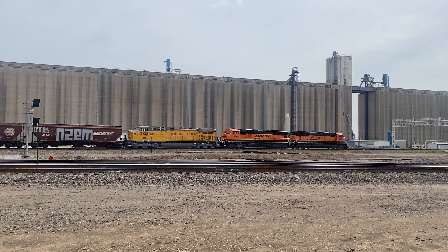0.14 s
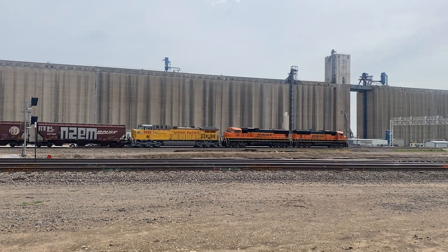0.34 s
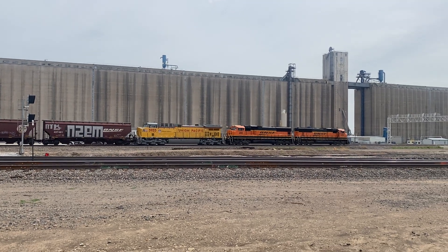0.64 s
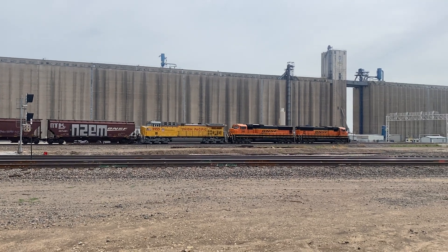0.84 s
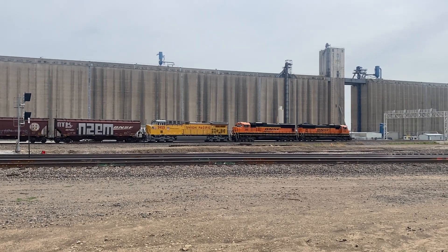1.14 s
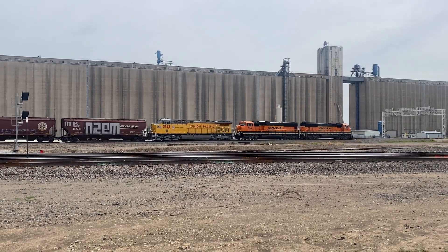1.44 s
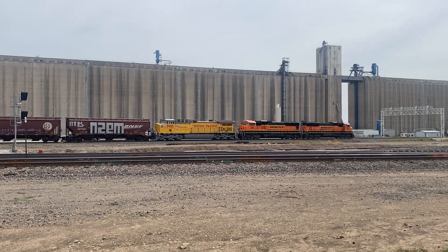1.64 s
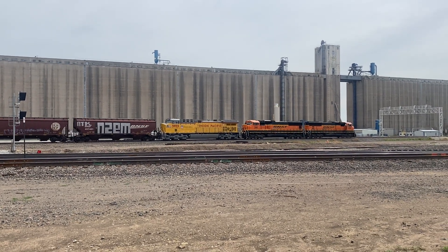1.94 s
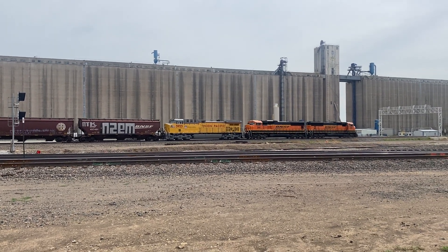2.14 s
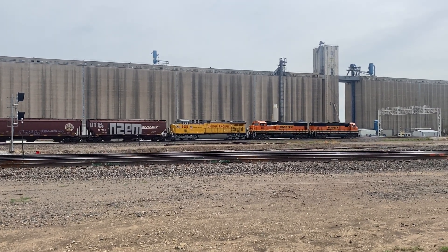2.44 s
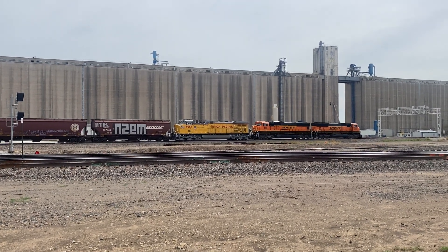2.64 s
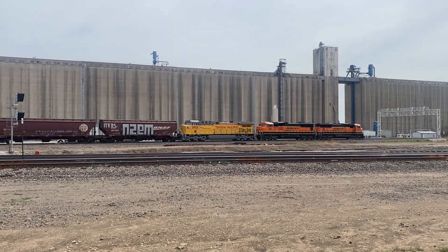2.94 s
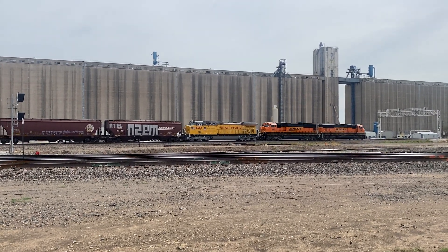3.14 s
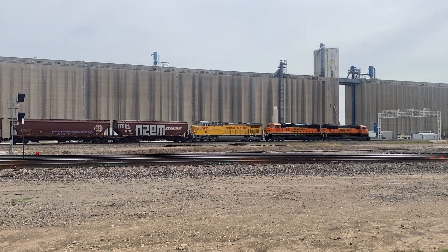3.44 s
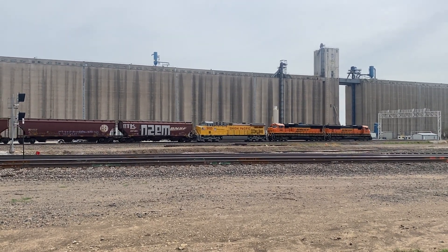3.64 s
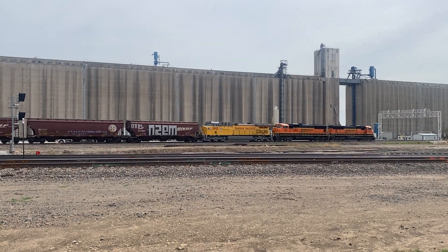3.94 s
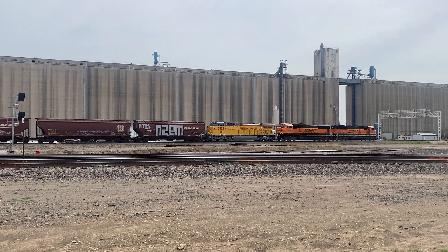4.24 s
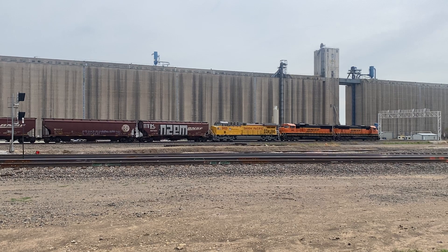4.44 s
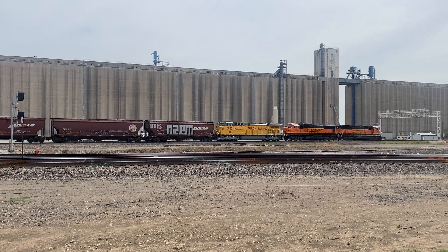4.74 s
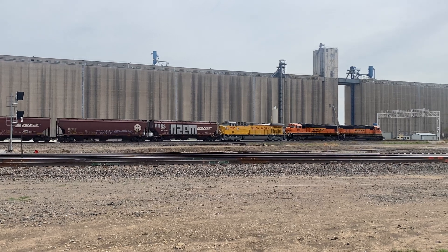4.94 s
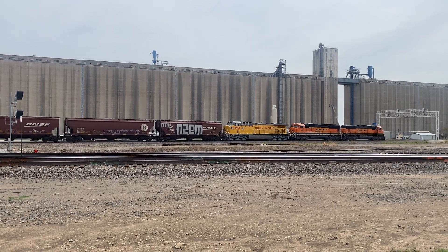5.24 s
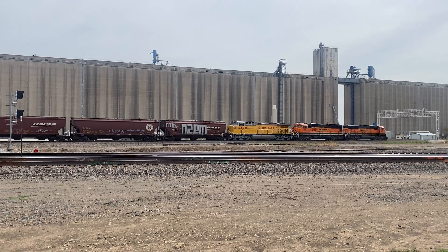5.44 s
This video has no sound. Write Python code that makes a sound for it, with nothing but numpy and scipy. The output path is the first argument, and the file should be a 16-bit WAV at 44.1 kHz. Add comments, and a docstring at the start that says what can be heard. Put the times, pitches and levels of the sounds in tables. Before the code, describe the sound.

Low beating diesel rumble with dull thumps, hissing, singing wheels on rail, a few faint bird whistles, and increasingly frequent metallic clanks.

```python
"""Slow freight train

Diesel locomotives haul a freight train slowly past a concrete grain elevator, heard across an open yard.
Their idling engines, made of sine waves and puffing noise, beat in a deep throb; short booms thump on top.
Wheels roar and rub as bands of noise and sing as wavering tones. Steel scrapes and knocks make wheels and
loose parts ring, and a small bird calls three times in gliding whistles."""
import sys
import numpy as np
from scipy import signal
from scipy.fft import rfft, irfft, next_fast_len
from scipy.io import wavfile

SR = 44100
rng = np.random.default_rng(int(sys.argv[2]) if len(sys.argv) > 2 else 0)


def bounce(signal):
    """Save signal as a 16-bit WAV file at the path given by the first command-line argument."""
    frames = np.transpose(np.atleast_2d(signal))
    limited = np.clip(frames, -1, 1)
    pcm = np.round(limited * 32767).astype(np.int16)
    wavfile.write(sys.argv[1], SR, pcm)


N = 246519


def from_db(db):
    """Decibels to gain."""
    return 10 ** (np.asarray(db) / 20)


def rms_one(x):
    """Scale to rms 1."""
    return x / np.sqrt(np.mean(x ** 2) + 1e-20)


def seconds():
    """The time of every sample."""
    return np.arange(N) / SR


def in_time(rows):
    """Join the points of a table with straight lines: one curve for each column after the times."""
    s, *columns = np.transpose(rows)
    return [np.interp(seconds(), s, column) for column in columns]


def at_hz(points, hz):
    """Read a table of pitches and values, on a log-frequency axis."""
    table_hz, values = np.transpose(points)
    return np.interp(np.log(hz), np.log(table_hz), values)


def pan(left_db):
    """Gains of the two channels; the left is this many dB above the right."""
    return from_db(np.array([[left_db], [-left_db]]) / 2)


def drift(rate):
    """Slow random wandering with spread 1; a higher rate (Hz) wanders faster."""
    step = 40  # samples between the computed points
    r = np.exp(-2 * np.pi * rate * step / SR)
    noise = rng.standard_normal(N // step + 2002)
    slow = signal.lfilter([1], [1, -2 * r, r * r], noise)[2000:]  # skip the filter's start
    return np.interp(np.arange(N) / step, np.arange(len(slow)), rms_one(slow))


def wavering(angle, width_hz):
    """A tone whose strength and phase wander at random, which widens its pitch."""
    return drift(width_hz) * np.cos(angle) + drift(width_hz) * np.sin(angle)


def swell(start, rise, hold, t60):
    """Gain that rises to 1, holds, then falls by 60 dB in every t60 seconds."""
    age = seconds() - start
    fading = np.maximum(age - rise - hold, 0)
    return np.clip(age / rise, 0, 1) * from_db(-60 * fading / t60)


def ring(drive, hz, t60):
    """A resonance: a unit click sets a sine of height 1 ringing, which then dies away."""
    r, w = from_db(-60 / (t60 * SR)), 2 * np.pi * hz / SR
    return signal.lfilter([0, np.sin(w)], [1, -2 * r * np.cos(w), r * r], drive + 1e-18)


# how alike left and right are at each pitch: (f/Hz, likeness from 0 to 1)
LIKENESS_BY_PITCH = [(60, .85), (130, .8), (250, .62), (450, .33), (700, .48), (900, .12), (1500, .1),
                     (1850, .55), (2450, .75), (2950, .3), (3370, .3), (3650, .75), (4100, .85),
                     (4600, .25), (5700, .6), (7200, .92), (15000, .92)]
# which side is louder at each pitch: (f/Hz, left minus right level/dB)
LEFT_LEAN_BY_PITCH = [(300, .8), (520, 3.1), (1550, 3.2), (1850, .7), (2500, .2), (3200, 3), (3700, -.6),
                      (4100, -.4), (4700, 3.8), (5800, 2.6), (7300, .6), (9000, .1)]


def spread(mid, side, hz):
    """Mix two unrelated signals into a stereo pair, as alike and as lopsided as the yard leaves this pitch."""
    alike = np.clip(at_hz(LIKENESS_BY_PITCH, hz), -1, 1)
    shared = np.sqrt((1 + alike) / 2) * mid
    opposed = np.sqrt((1 - alike) / 2) * side * np.array([[1], [-1]])
    return (shared + opposed) * pan(at_hz(LEFT_LEAN_BY_PITCH, hz))


def banded_noise(spectrum, patchy_db):
    """Third-octave bands of stereo noise, each with its own level and flicker; rms 1."""
    edges = 20 * 2 ** (np.arange(30) / 3)
    out, white = 0, rng.standard_normal((2, 2, N))
    for k, (low, high) in enumerate(zip(edges, edges[1:])):
        if high > spectrum[0][0] and low < spectrum[-1][0]:
            band = signal.butter(2, [low, high], "band", fs=SR, output="sos")
            mid, side = signal.sosfilt(band, white[k % 2])  # neighbours use unrelated noise
            hz = np.sqrt(low * high)
            level = from_db(at_hz(spectrum, hz) + patchy_db * drift(15.7))
            out = out + level * spread(mid, side, hz)
    return rms_one(out)


def tones(modes, waver):
    """Sum of tones, each a steady line plus a wavering part, scattered differently to each side."""
    out = 0
    for hz, db, width_hz in modes:
        angle = 2 * np.pi * hz * seconds()
        mid = np.sqrt(2) * np.cos(angle) + waver * wavering(angle, width_hz)
        side = wavering(angle, width_hz)
        out = out + from_db(db) * spread(rms_one(mid), side, hz)
    return out


def driven(force, hz, t60):
    """Rough contact, as noise, shakes a resonance on either side; it gets as much power as the force has."""
    rung = rms_one(ring(force * rng.standard_normal((2, N)), hz, t60))
    return np.sqrt(np.mean(force ** 2)) * spread(*rung, hz)


def struck(s, rise, hz, t60):
    """A resonance starts as a clean sine and dies away."""
    angle = 2 * np.pi * hz * (seconds() - s)
    return np.sqrt(2) * swell(s, rise, 0, t60) * spread(np.sin(angle), np.cos(angle), hz)


# one dip of the engines' bass: (t/s, fall/s, hold/s, recovery/s, depth/dB)
BASS_DIP_SHAPE = (1.11, 0.2, 0.17, 0.64, 17)


def bass_dip():
    """The bass sinks once and recovers: how many dB it is down."""
    *times, depth_db = BASS_DIP_SHAPE
    return depth_db * np.interp(seconds(), np.cumsum(times), [0, 1, 1, 0])


EVEN_FIRING_HZ, EVEN_START_S = 71.0, -.0006
LOPING_FIRING_HZ, LOPING_START_S, CYLINDERS = 70.95, .0985, 16


def even_firing():
    """Angle of the even engine's firing, one full turn for each firing."""
    return 2 * np.pi * EVEN_FIRING_HZ * (seconds() - EVEN_START_S)


# one engine draws away as the other comes nearer, before dip and throbs:
# (t/s, even engine level/dB, loping engine level/dB)
ENGINE_LEVELS = [(0, -21.5, -42), (1.1, -22.5, -36), (2.2, -25, -30), (3.1, -27, -26.5),
                 (5.59, -30.5, -24.5)]
# tones of the loping engine: (multiple of the crank rate, level/dB)
LOPING_TONES = [(11, -14), (12, -14), (13, -10), (15, 0), (17, -3.5), (18, -13), (24, -13)]


def engine_notes():
    """One engine fires evenly; the other's unequal cylinders sound crank multiples around its firing rate."""
    even_db, loping_db = in_time(ENGINE_LEVELS)
    dip_db, unsteady_db = bass_dip(), 1.47
    even = from_db(even_db - dip_db + unsteady_db * drift(1.7)) * np.cos(even_firing())
    crank = 2 * np.pi * LOPING_FIRING_HZ / CYLINDERS * (seconds() - LOPING_START_S)
    loping = 0
    for k, db in LOPING_TONES:
        loping = loping + from_db(db + unsteady_db * drift(4.1)) * np.cos(k * crank)
    loping = from_db(loping_db - dip_db) * loping
    return np.sqrt(2) * (even + loping) * pan(0.78)


# tone colour of the exhaust noise: (f/Hz, relative level/dB per Hz)
EXHAUST_SPECTRUM = [(22, -33), (35, -19), (52, -0.5), (85, -0.5), (115, -6), (170, -23), (280, -28.5),
                    (500, -51.5)]
# ups and downs of the exhaust rumble, before the lift below: (t/s, level/dB)
RUMBLE_LEVELS = [(0, -29), (.7, -28), (.95, -32.5), (1.13, -28.5), (1.5, -31.5), (2.1, -35), (2.35, -30),
                 (3.1, -34), (3.5, -29), (5.59, -34)]


def exhaust(lift_db=4.5, puff=0.28, dip_share=0.1):
    """Exhaust gas rumbles as noise in puffs, one for each firing of the even engine."""
    rumble_db, = in_time(RUMBLE_LEVELS)
    level = from_db(rumble_db + lift_db - dip_share * bass_dip())
    return level * banded_noise(EXHAUST_SPECTRUM, patchy_db=-0.5) * (1 + puff * np.cos(even_firing()))


# the strongest throbs: (t/s, gain/dB)
THROB_GAINS = [(.11, 5.5), (0.24, 8.5), (.35, 1), (0.487, 6), (.64, 1), (0.814, -1.5), (0.977, 5.5),
               (1.134, 9.5), (2.105, 5), (2.33, 7), (2.8, 0.5), (3.24, 2), (3.6, 2.5), (3.478, 4),
               (3.715, 1.5), (3.91, 8.5), (4.193, 4), (4.33, 4), (4.525, 3), (4.825, 2.5)]


def engines(throb_s=0.0077):
    """Two engines of nearly equal speed beat together; short bell-shaped throbs shape notes and exhaust."""
    throb_db = 0
    for s, db in THROB_GAINS:
        throb_db = throb_db + db * np.exp(-.5 * ((seconds() - s) / throb_s) ** 2)
    return (engine_notes() + exhaust()) * from_db(throb_db)


# tone colour of the rolling wheels: (f/Hz, relative level/dB per Hz)
ROLLING_SPECTRUM = [(120, -90), (200, 5), (282, -4), (647, -6.5), (721, -8), (849, -10.5), (2090, -17),
                    (2290, -15.5), (2600, -7), (2800, -23.5), (4010, -21.5), (7550, -43), (9050, -42),
                    (10600, -65), (15000, -85)]
ROLL_START_DB, ROLL_FADE_DB_PER_S = -37, 0.51


def rolling():
    """Wheels roar on the rail as noise that fades steadily as the locomotives move on."""
    level = from_db(ROLL_START_DB - ROLL_FADE_DB_PER_S * seconds())
    return level * banded_noise(ROLLING_SPECTRUM, patchy_db=1.4)


# flanges (wheel rims) rub on the rail, levels before the later trims:
# (t/s, rise/s, hold/s, hiss level/dB, drive of the low wheel tones level/dB)
FLANGE_RUBS = [(-.05, 0.081, 0.42, -47, -46), (0.55, 0.055, 0.5, -47.5, -49.5),
               (1.195, 0.35, 0.2, -48, -53), (2.535, 0.011, 0.25, -45, -63),
               (2.98, 0.49, 0.52, -45.5, -43.8), (4.302, 0.16, 0.75, -51.5, -89), (3.58, .2, .08, -60, -45),
               (3.99, 0.063, 0.21, -51, -46.5)]
HISS_T60_S, HISS_REST_DB = 2.7, -61
LOW_T60_S, LOW_REST_DB = .7, -61.5


def friction():
    """How strongly the rubbing flanges hiss, and how hard they drive the low wheel tones; powers add."""
    hiss, low = from_db(HISS_REST_DB) ** 2, from_db(LOW_REST_DB) ** 2
    for s, rise, hold, hiss_db, low_db in FLANGE_RUBS:
        hiss = hiss + (from_db(hiss_db) * swell(s, rise, hold, HISS_T60_S)) ** 2
        low = low + (from_db(low_db) * swell(s, rise, hold, LOW_T60_S)) ** 2
    return np.sqrt(hiss), np.sqrt(low)


# tone colour of the rubbing: (f/Hz, relative level/dB per Hz)
RUBBING_SPECTRUM = [(1400, -19), (1900, 1), (2700, 5.5), (3300, 1.5), (4300, 4.5), (5000, -4), (6000, 1),
                    (7500, -2.5), (9000, -7.5), (11500, -6.5), (15500, -63)]


def rubbing(trim_db=-1.5):
    """Flanges rubbing on the rail hiss as patchy noise."""
    hiss, _ = friction()
    return from_db(trim_db) * hiss * banded_noise(RUBBING_SPECTRUM, patchy_db=2.5)


# how much and how fast friction roughens the singing
ROUGH_DB, ROUGH_RATE_HZ = 2.2, 55
# low tones of the wheels: (f/Hz, relative level/dB, width/Hz)
LOW_WHEEL_TONES = [(1769, -9, 16), (1828, -9, 45), (1846, -3, 14), (2218, -13, 24), (4580, -12, 80),
                   (5750, -19, 90), (6180, -19, 70), (7480, -21, 130)]


def low_singing(trim_db=-1.0):
    """Friction keeps the low wheel resonances sounding, with a rough level."""
    _, drive = friction()
    rough = from_db(trim_db + ROUGH_DB * drift(ROUGH_RATE_HZ))
    return rough * drive * tones(LOW_WHEEL_TONES, waver=1.0)


# the main tone of the wheels: (f/Hz, relative level/dB, width/Hz)
MAIN_WHEEL_TONE = [(2517, 0, 9)]
# swells of the main tone, before flutter: (t/s, half length/s, level/dB)
MAIN_SWELLS = [(.16, .05, -54), (0.414, 0.14, -46), (.66, 0.038, -45), (0.954, 0.2, -49),
               (1.225, 0.31, -50.5), (1.542, 0.23, -52), (1.748, 0.077, -45), (2.005, 0.021, -44.5),
               (2.154, 0.059, -45), (2.323, 0.062, -46.5), (2.6, 0.03, -46), (3.123, 0.053, -43),
               (3.316, 0.038, -44.5), (3.537, 0.041, -46), (3.777, 0.078, -49), (3.99, 0.058, -42.5),
               (4.203, 0.052, -45), (4.458, 0.14, -48), (4.688, 0.027, -45), (4.846, 0.076, -47),
               (5.08, 0.066, -42), (5.304, 0.039, -47.5)]
SWELL_REST_DB = -59
FLUTTER_DB, FLUTTER_RATE_HZ = 3.0, 16


def main_singing():
    """Friction makes the main wheel resonance sing in swells, with a fluttering, rough level."""
    power = from_db(SWELL_REST_DB) ** 2
    for s, half, db in MAIN_SWELLS:
        power = power + from_db(db) ** 2 * np.exp(-((seconds() - s) / half) ** 2)
    flutter_db = FLUTTER_DB * np.tanh(drift(FLUTTER_RATE_HZ))  # tanh limits the swing
    rough_db = ROUGH_DB * drift(ROUGH_RATE_HZ)
    return np.sqrt(power) * from_db(flutter_db + rough_db) * tones(MAIN_WHEEL_TONE, waver=0.053)


# whine of the machinery: (f/Hz, level/dB, width/Hz)
MACHINERY_TONES = [(468.6, -51.5, 4.7), (667.4, -50, 66), (979, -58, 5), (1052, -59.5, 4.9),
                   (1470, -63.5, 7.9), (2156, -60, 11.4), (3921, -61, 14)]


def whine():
    """The locomotives' machinery whines in wavering tones throughout."""
    return tones(MACHINERY_TONES, waver=2.7)


# thin squeals: (t/s, hold/s, starting f/Hz, glide/Hz per s, level/dB)
SQUEAL_TONES = [(0.025, 0.06, 3985, -7, -51.5), (.41, 0.12, 4005, 0, -51.5), (0.54, 0.3, 4000, -2.5, -47),
                (0.85, 0.66, 3921, 1, -55), (.6, .12, 2215, 0, -55), (.89, .17, 2215, 0, -51),
                (2.3, .1, 3915, 0, -56), (2.445, 0.2, 3915, 170, -49), (2.7, .17, 3960, -150, -55),
                (3.0, .13, 3975, 0, -55.5), (3.166, 0.22, 3930, 2, -50), (3.354, 0.12, 3985, 40, -48),
                (3.95, .59, 3920, -0.5, -49.5), (4.07, .11, 4600, 0, -54), (3.68, .16, 1846, 0, -48),
                (5.284, 0.05, 3910, 6, -51.5), (5.507, .05, 3940, 15, -48.5)]
SQUEAL_RISE_S, SQUEAL_T60_S = 0.05, 0.84
SQUEAL_WIDTH_HZ, SQUEAL_WAVER = 60, .5


def squeals():
    """A slipping wheel holds one thin, wavering tone whose pitch may creep up or down."""
    out = 0
    for s, hold, start_hz, glide, db in SQUEAL_TONES:
        hz = start_hz + glide * np.clip(seconds() - s, 0, SQUEAL_RISE_S + hold)
        angle = 2 * np.pi * np.cumsum(hz) / SR
        mid = np.cos(angle) + SQUEAL_WAVER * wavering(angle, SQUEAL_WIDTH_HZ)
        side = wavering(angle, SQUEAL_WIDTH_HZ)
        tone = spread(rms_one(mid), side, start_hz)
        out = out + from_db(db) * swell(s, SQUEAL_RISE_S, hold, SQUEAL_T60_S) * tone
    return out


# low thumps: (t/s, strength level/dB, tilt toward the upper boom tones/dB)
THUMP_BLOWS = [(0.088, -17, -20), (0.23, -32.5, 4.5), (.34, -40, -17), (.507, -24.5, 5.5), (.632, -24, -4),
               (0.707, -28.5, 2), (1.079, -17, -11), (1.156, -10.5, -14), (1.199, -25, -1),
               (1.27, -22.5, 5), (1.328, -23, -6), (1.374, -25, 1), (1.569, -13.5, -13.5), (1.728, -24, -1),
               (1.774, -43, 15), (1.844, -31.5, 9.5), (2.282, -26, -6), (2.519, -37, 4), (2.622, -33, 1),
               (3.4, -35, -1), (3.498, -25.5, -7.5), (3.694, -22, -2), (3.823, -31, -18),
               (4.162, -16.5, -4), (4.311, -14.5, -13), (4.714, -29, -1.5), (5.259, -33, 5),
               (5.521, -32.5, 0)]
# the short boom of each thump: (f/Hz, relative level/dB, T60/s)
BOOM_TONES = [(97, -2, 0.075), (170, 2, 0.057), (261.6, -2.5, 0.055), (357, -5.5, 0.018)]


def thumps(lead_s=0.0032, rebound_db=-1.5, rebound_s=0.01222):
    """Soft double blows, each with its own mix of boom resonances on either side; some reach higher."""
    s, strength, tilt = np.transpose(THUMP_BLOWS)
    first = np.round((s - lead_s) * SR).astype(int)  # clicks come a little before the listed time
    gap = rebound_s * SR * rng.uniform(0.564, 2.025, len(first))
    second = first + gap.astype(int)
    chance_db = rng.normal(0, 2.6, (len(first), len(BOOM_TONES), 2))
    out = 0
    for k, (hz, db, t60) in enumerate(BOOM_TONES):
        clicks = np.zeros((2, N))
        # the tilt counts 0, 1/2, 1 and 3/2 times from the lowest tone to the highest
        clicks[:, first] = from_db(strength + tilt * k / 2 + chance_db[:, k].T + db)
        clicks[:, second] += from_db(rebound_db) * clicks[:, first]
        out = out + (-1) ** k * ring(clicks, hz, t60)
    dull = signal.butter(4, 470, fs=SR, output="sos")
    return signal.sosfilt(dull, out) * pan(.5)


SLIPS_PER_S, SLIP_T60_S, SLIP_SHARE = 150, 0.025, 0.42  # share of the power


def slips():
    """Steel sticks and slips: a gritty run of tiny strikes on a steady part; rms 1."""
    strikes = (rng.random(N) < SLIPS_PER_S / SR) * rng.uniform(.3, 1, N)
    decay = from_db(-120 / (SLIP_T60_S * SR))  # power, so twice the dB
    power = signal.lfilter([1], [1, -decay], strikes + 1e-18)
    share = np.clip(SLIP_SHARE, 0, 1)
    return np.sqrt(1 - share + share * power / power.mean())


# steel scrapes: (t/s, drive level/dB, rise/s, hold/s, T60/s,
# low ringing level/dB, high ringing level/dB, clank level/dB), the last three relative
SCRAPE_BURSTS = [(0.581, -45.5, 0.0048, 0.01, 0.18, -12, -8, -2),
                 (1.715, -40.5, 0.0047, 0.013, 0.12, 6, 3.5, 4.5),
                 (2.543, -55, .002, 0.12, .44, -8, -3, -14), (2.644, -49, 0.071, 0.047, 0.39, -15, -13, -2),
                 (2.828, -49, .002, 0.018, 0.063, -7, 12, 3), (3.925, -41, 0.0072, 0.021, 0.21, 3, 3, 6),
                 (4.291, -43.5, 0.0029, 0.047, 0.47, -6, 0, 1.5),
                 (4.401, -41.5, 0.082, 0.029, 0.24, 2, 3, 1),
                 (4.577, -47.5, .004, 0.033, 0.27, 2.5, -5, -1), (4.843, -45.5, .002, 0.031, 1, 0, -14, -3),
                 (4.992, -43.5, .006, 0.082, 0.35, 0, 5, 4),
                 (5.033, -39.5, 0.0034, 0.014, 0.31, -1, 10, 4.5),
                 (5.127, -45.5, 0.0049, 0.01, 0.14, 8, -12, -15),
                 (5.165, -50, 0.0022, 0.019, 0.15, 0, 0, -2), (5.578, -41, 0.0055, .02, .2, -11, -2, 1)]
# tone colour of the scraping grit: (f/Hz, relative level/dB per Hz)
SCRAPING_SPECTRUM = [(1500, -30), (2600, -27), (3900, -16), (5600, 1), (7700, 6), (9300, 7), (11000, -2),
                     (13000, 19), (15500, -12)]
# what a scraped wheel rings with: (f/Hz, relative level/dB, T60/s)
WHEEL_RING_TONES = [(2153, -18, .5), (2751, -11, .08), (3370, -23, .55), (3601, -18, .55), (3920, -15, .4),
                    (4134, -17, .35), (4317, -17, .3), (5518, -19, .14), (6142, -22, .16), (7380, -22, .5),
                    (10440, -22, .7), (11020, -20, .5), (11530, -21, .35)]
# damped clank of the bogie, the frame that holds the wheels: (f/Hz, relative level/dB, width/Hz)
BOGIE_CLANK_TONES = [(2170, -12, 130), (2760, -10.5, 130), (3740, -7.5, 170), (4330, -10, 130),
                     (4640, -11, 140), (5550, -9, 130), (6120, -15, 120), (6500, -15.5, 130),
                     (6780, -16, 130), (7380, -14, 280), (8620, -10, 260), (9450, -8, 240),
                     (10450, -9.5, 140), (11050, -10.5, 140), (11520, -10, 120), (12120, -12, 130),
                     (12520, -14, 140)]
HIGH_RING_HZ = 7000  # high ringing starts here
GRIT_DB = -5


def scrapes(ring_db=2.0, tail_db=-12.5, tail_t60=1.0):
    """Steel slips on steel in gritty bursts that shake the bogie, ring the wheel and linger across the yard."""
    powers = []
    for s, db, rise, hold, t60, *_ in SCRAPE_BURSTS:
        age = seconds() - s
        after = np.maximum(age - rise - hold, 0)
        onset = from_db(db) * np.clip(age / rise, 0, 1)
        direct = from_db(-60 * after / t60)
        tail = from_db(tail_db - 60 * after / tail_t60)
        powers.append(onset ** 2 * (direct ** 2 + tail ** 2))
    powers = np.array(powers)
    low_db, high_db, clank_db = np.transpose(SCRAPE_BURSTS)[-3:]
    grain = slips()
    grit = banded_noise(SCRAPING_SPECTRUM, patchy_db=-1.0)
    out = from_db(GRIT_DB) * np.sqrt(powers.sum(axis=0)) * grain * grit
    modes = []
    for hz, db, t60 in WHEEL_RING_TONES:
        modes.append((hz, db + ring_db + (low_db if hz < HIGH_RING_HZ else high_db), t60))
    for hz, db, width_hz in BOGIE_CLANK_TONES:
        t60 = np.log(1000) / (np.pi * width_hz)  # a wider resonance dies sooner
        modes.append((hz, db + clank_db * (hz < HIGH_RING_HZ), t60))
    for hz, db, t60 in modes:
        # every scrape drives each resonance with a strength of its own
        strength = from_db(db + rng.normal(0, 2, len(SCRAPE_BURSTS)))
        out = out + driven(np.sqrt(strength ** 2 @ powers) * grain, hz, t60)
    return out


# bird calls: (t/s, length/s, start f/Hz, middle f/Hz, end f/Hz, peak level/dB before panning)
BIRD_CALLS = [(.715, .145, 3500, 3860, 3680, -45), (.945, .13, 3560, 3860, 3620, -45.5),
              (2.055, .042, 4420, 4180, 3650, -46.5)]


def bird():
    """Thin whistles, each a sine whose pitch curves smoothly through three points."""
    out = np.zeros(N)
    for s, length, start_hz, middle_hz, end_hz, db in BIRD_CALLS:
        along = np.clip((seconds() - s) / length, 0, 1)
        curve = np.polyfit([0, .5, 1], [start_hz, middle_hz, end_hz], 2)
        angle = 2 * np.pi * np.cumsum(np.polyval(curve, along)) / SR
        out += from_db(db) * np.sin(np.pi * along) * np.sin(angle)
    return out * pan(1.0)


# hard knocks, two pitches each: (t/s, chatter length before fading/s, level/dB, lower f/Hz, upper f/Hz,
# upper minus lower level/dB, ring T60/s); strike and chatter gains below are added to the level
KNOCK_HITS = [(1.719, .018, -44, 3720, 5600, -2, .07), (1.724, .016, -48, 2210, 4650, 4, .07),
              (2.838, .022, -42.5, 2130, 5700, -5, .07), (3.925, .018, -35.5, 2750, 3850, -1, .07),
              (4.305, .018, -41, 3700, 5630, -4, .08), (4.312, .018, -46, 4520, 6520, 0, .08),
              (4.427, .018, -43, 3720, 7290, -8, .06), (4.467, .028, -45, 2730, 5570, -1, .08),
              (5.042, .02, -38.5, 2760, 3800, -5, .07), (5.037, .018, -39, 5480, 6800, -4, .06),
              (5.164, .008, -46, 5450, 7150, 0, .05)]
STRIKE_RISE_S, STRIKE_DB = .003, 2.5
CHATTER_T60_S, CHATTER_DB = .07, -6


def knocks():
    """A loose steel part is struck hard, then chatters for a moment, ringing at its own pitches."""
    out = 0
    for s, hold, db, lower_hz, upper_hz, upper_db, t60 in KNOCK_HITS:
        chatter = from_db(CHATTER_DB) * swell(s, hold / 2, hold / 2, CHATTER_T60_S)
        for hz, mode_db in (lower_hz, db), (upper_hz, db + upper_db):
            strike = from_db(STRIKE_DB) * struck(s, STRIKE_RISE_S, hz, t60)
            out = out + from_db(mode_db) * (strike + driven(chatter, hz, t60))
    return out


# wheel tones that ring on: (t/s, rise/s, f/Hz, level/dB, T60/s)
LINGERING_TONES = [(1.72, .01, 10490, -54, .6), (2.83, .01, 10440, -55, .7), (3.93, .01, 11100, -47, .25),
                   (4.288, .005, 11480, -49, .35), (4.3, .008, 3605, -45.5, .45),
                   (4.42, .02, 3610, -52, .5), (4.57, .035, 3610, -49, .4), (5.045, .07, 3370, -43, .55),
                   (5.05, .035, 4317, -47, .55), (5.05, .02, 11010, -51, .6), (5.08, .04, 10440, -56, .9)]


def afterring():
    """After a hard scrape single wheel resonances sing on as clear tones."""
    out = 0
    for s, rise, hz, db, t60 in LINGERING_TONES:
        out = out + from_db(db) * struck(s, rise, hz, t60)
    return out


def scene():
    """The train and the bird."""
    train = engines() + rolling() + rubbing() + low_singing() + main_singing() + whine()
    train = train + squeals() + thumps() + scrapes() + knocks() + afterring()
    return train + bird()


PORT_LAG_S, PORT_CORNER_HZ, CUTOFF_HZ = .000272, 7350, 15800


def record(dry):
    """The microphone drops the deepest bass, its left port hears the treble late, and the top is cut."""
    size = next_fast_len(N + SR // 10)
    above_corner = np.maximum(np.fft.rfftfreq(size, 1 / SR) - PORT_CORNER_HZ, 0)
    late = np.exp(-2j * np.pi * PORT_LAG_S * above_corner)
    left = irfft(rfft(dry[0], size) * late, size)[:N]
    bass_cut = signal.butter(6, 30, "high", fs=SR, output="sos")
    thin = signal.sosfilt(bass_cut, np.array([left, dry[1]]))
    top_cut = signal.ellip(10, .2, 80, CUTOFF_HZ, fs=SR, output="sos")
    return signal.sosfilt(top_cut, thin)


dry = scene()
out = record(dry)
bounce(out)
```